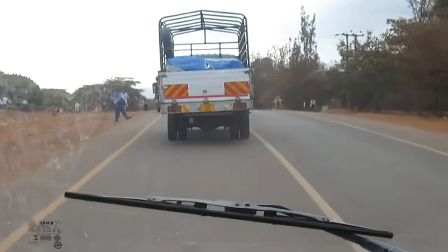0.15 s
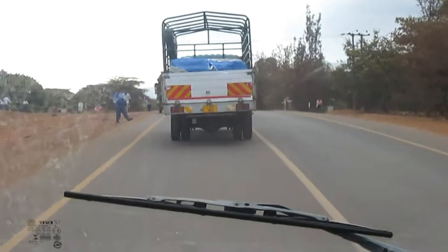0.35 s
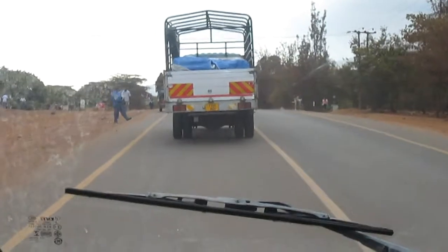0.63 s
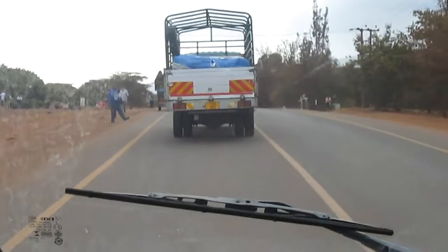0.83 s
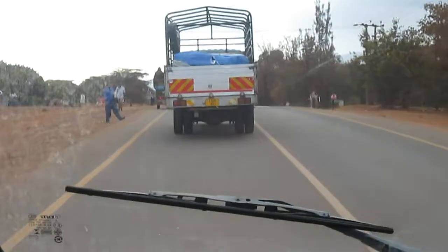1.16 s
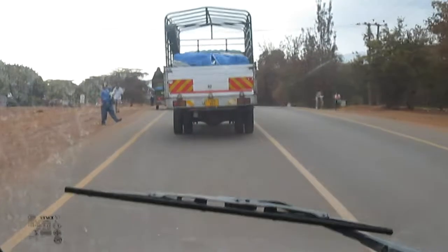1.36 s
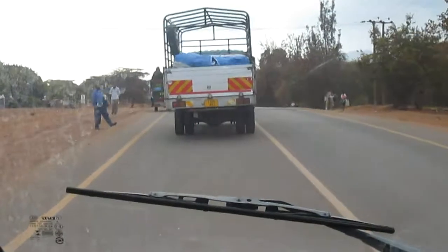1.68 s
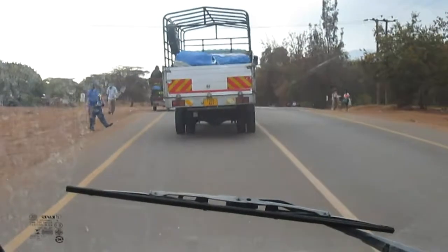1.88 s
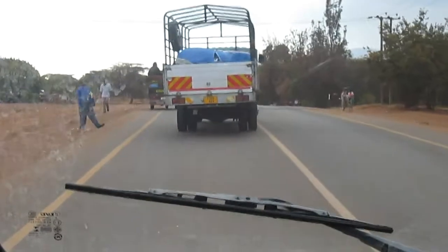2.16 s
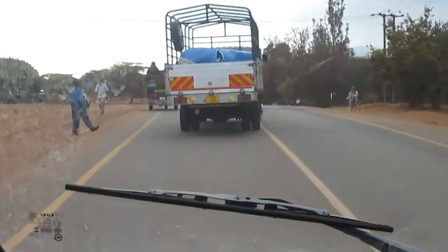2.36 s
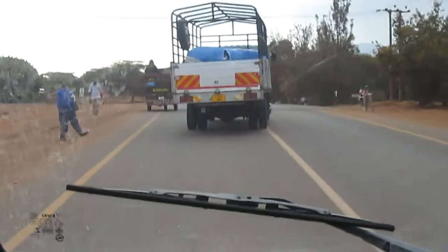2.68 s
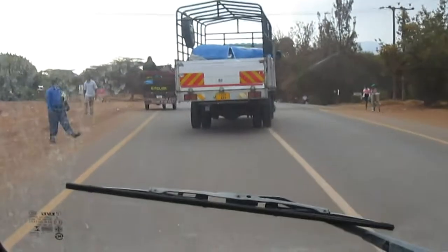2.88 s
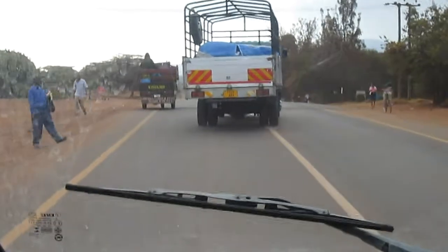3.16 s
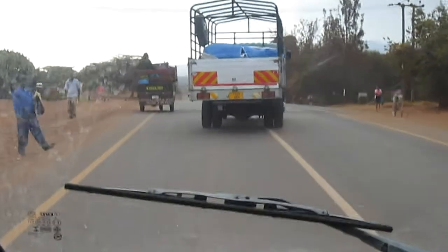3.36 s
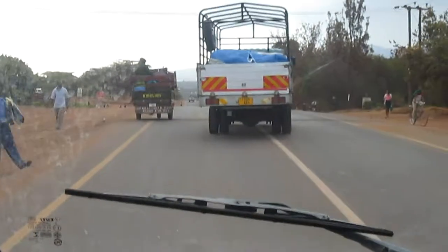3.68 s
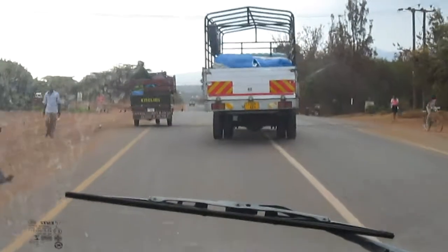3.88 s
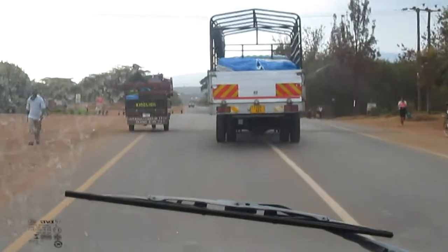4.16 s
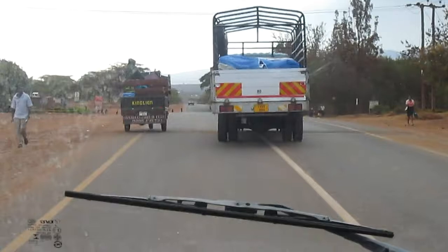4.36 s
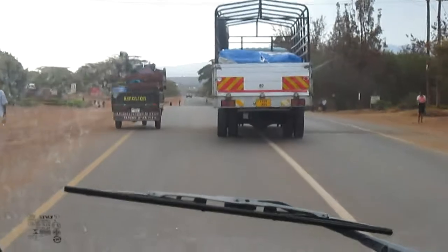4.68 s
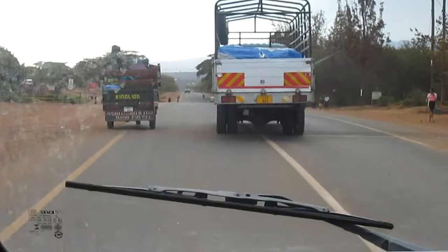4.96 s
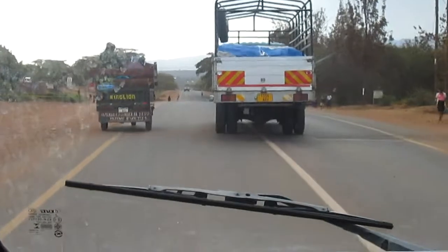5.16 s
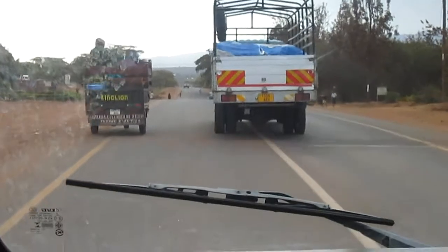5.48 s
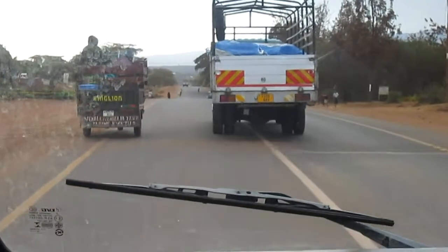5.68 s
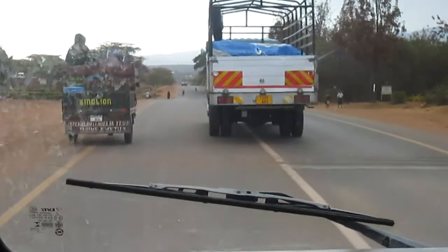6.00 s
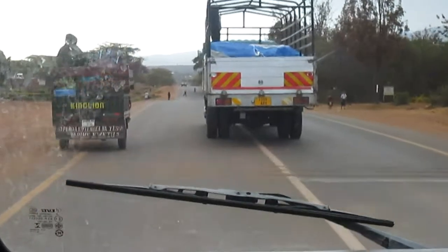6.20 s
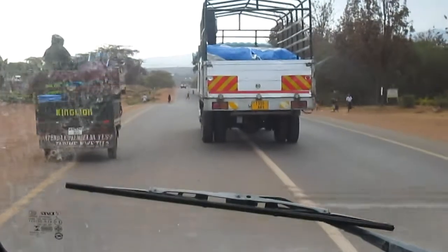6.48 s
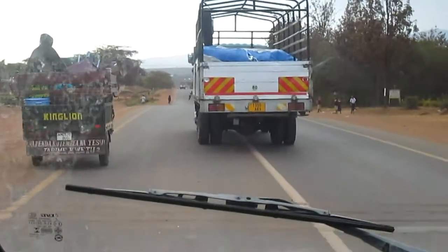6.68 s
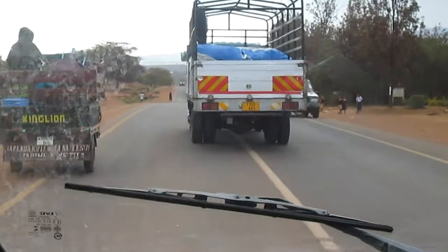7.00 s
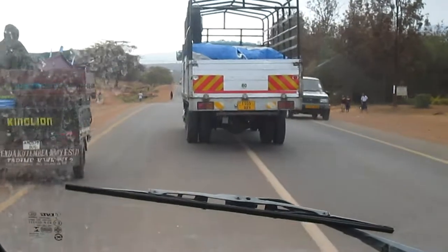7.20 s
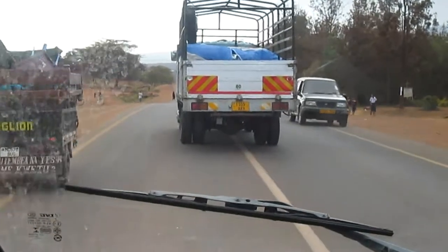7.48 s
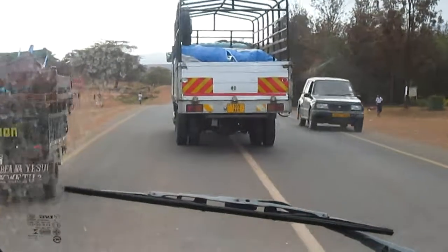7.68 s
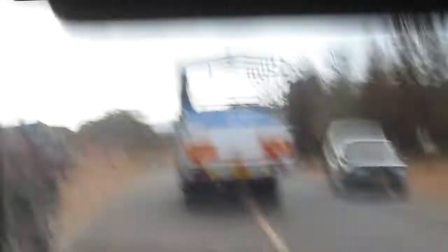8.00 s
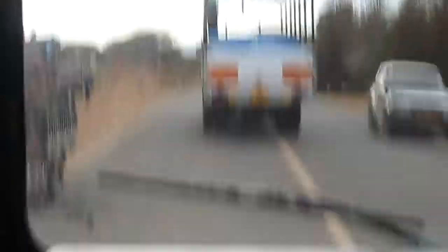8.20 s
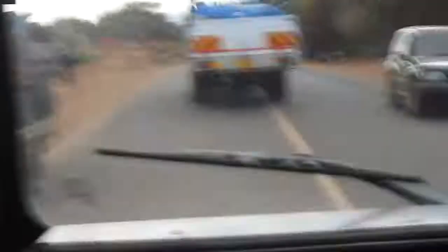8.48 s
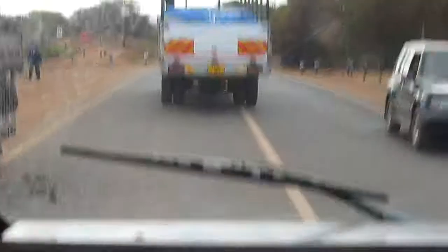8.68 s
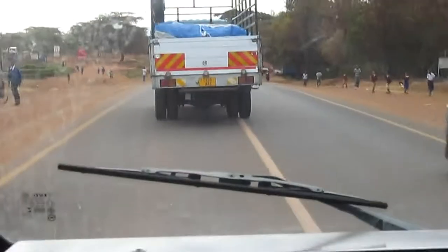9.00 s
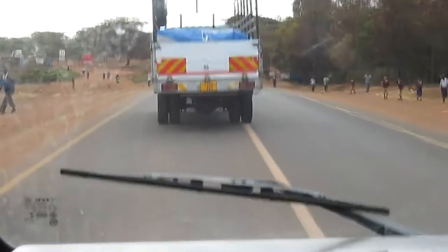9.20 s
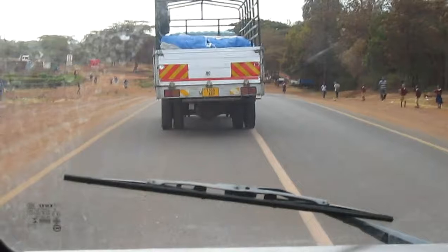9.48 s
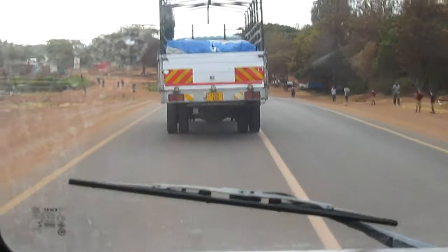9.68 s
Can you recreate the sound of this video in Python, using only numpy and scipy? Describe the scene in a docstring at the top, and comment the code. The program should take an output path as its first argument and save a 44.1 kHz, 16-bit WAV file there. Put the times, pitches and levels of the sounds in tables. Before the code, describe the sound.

Inside a vehicle on a tarred road, the engine booms and clatters over steady tyre rumble. A faint camera zoom motor whirs. About halfway the engine eases off, and the body knocks and loose fittings clonk over bumps, briefly lowering the overall level. Another bump and a second faint whir follow, then wind buffets and chokes the small microphone before the softer drone returns.

```python
"""Inside a four-cylinder vehicle on a tarred road, heard through a passenger's small camera.
The engine booms in the cabin's air modes and clatters under load, then coasts. Tyres rumble and hiss;
over two ridges the body knocks and loose fittings clonk. Each jolt ducks the camera's gain, which
recovers slowly. The zoom motor whirs twice; late gusts buffet, thump and choke the microphone."""
import sys
import numpy as np
from scipy import signal
from scipy.fft import rfft, irfft, next_fast_len
from scipy.io import wavfile

SR = 44100
rng = np.random.default_rng(int(sys.argv[2]) if len(sys.argv) > 2 else 0)


def to_wav(sig):
    """Store sig (one row per channel, or 1-D mono) as 16-bit WAV at the path in sys.argv[1].

    Samples outside -1..1 are clipped; the rate is SR.
    """
    pcm = np.clip(np.atleast_2d(sig), -1, 1) * 32767
    pcm = np.round(pcm).astype(np.int16)
    wavfile.write(sys.argv[1], SR, pcm.T)  # frames by channels


N = 434385
TIME = np.arange(N) / SR

# Gusts choke the microphone. Each row: start and end in seconds.
CHOKES = [(7.977, 7.982), (8.202, 8.211), (8.230, 8.240), (8.285, 8.296), (8.308, 8.330), (8.357, 8.375),
          (8.388, 8.398), (8.404, 8.415), (8.433, 8.448), (8.487, 8.497), (8.516, 8.530), (8.557, 8.563),
          (8.590, 8.603)]


def from_db(db):
    """Decibels to gain."""
    return 10 ** (np.asarray(db) / 20)


def rms_one(x):
    """Scale to rms 1."""
    return x / np.sqrt(np.mean(x ** 2) + 1e-20)


def curve(rows):
    """Straight lines through (seconds, value) rows."""
    return np.interp(TIME, *np.transpose(rows))


def window(start_s, end_s, edge_s):
    """Gate with sloping edges."""
    return np.clip(np.minimum(TIME - start_s, end_s - TIME) / edge_s + .5, 0, 1)


def swell(start_s, end_s, rise_db_per_s, fall_db_per_s):
    """Gain that reaches 1 at the start, holds, and falls after the end."""
    early_s, late_s = np.maximum(start_s - TIME, 0), np.maximum(TIME - end_s, 0)
    return from_db(-rise_db_per_s * early_s - fall_db_per_s * late_s)


def pulse(at_s, half_s):
    """Gaussian of height 1."""
    return np.exp(-((TIME - at_s) / half_s) ** 2)


def drift(rate_hz):
    """Random wander of spread 1."""
    step, settle = 40, 2000
    r = np.exp(-2 * np.pi * rate_hz * step / SR)
    slow = signal.lfilter([1], [1, -2 * r, r * r], rng.standard_normal(N // step + settle + 2))[settle:]
    return np.interp(np.arange(N) / step, np.arange(len(slow)), rms_one(slow))


def tone(turns, waver):
    """Sine of rms near 1, wavering in level and phase."""
    phase = 2 * np.pi * turns
    return np.sqrt(2) * ((1 + waver * drift(2.28)) * np.sin(phase) + waver * drift(4) * np.cos(phase))


def colour(x, spectrum):
    """Shape x by (Hz, dB) rows, rolling off beyond their ends; rms 1."""
    hz, db = np.transpose(spectrum)
    size = next_fast_len(N)
    log_f = np.log(np.maximum(np.arange(size // 2 + 1) * SR / size, 1))
    beyond = np.abs(log_f - np.clip(log_f, np.log(hz[0]), np.log(hz[-1])))
    shape = from_db(np.interp(log_f, np.log(hz), db) - 20 * beyond)
    return rms_one(irfft(rfft(x, size) * shape, size)[:N])


def noise(spectrum):
    """Coloured noise; rms 1."""
    return colour(rng.standard_normal(N), spectrum)


def resonance(x, hz, width_hz):
    """Two-pole band-pass, peak gain 1."""
    r = np.exp(-np.pi * width_hz / SR)
    poles = [1, -2 * r * np.cos(2 * np.pi * hz / SR), r * r]
    return signal.lfilter(np.array([1, 0, -1]) * (1 - r * r) / 2, poles, x)


def hiss_band(hz, width_hz):
    """Noise twice through one resonance; rms 1."""
    return rms_one(resonance(resonance(rng.standard_normal(N), hz, width_hz), hz, width_hz))


def ring(force, hz, t60_s):
    """Damped mode: a unit click rings a sine of height 1."""
    r, w = np.exp(-np.log(1000) / (t60_s * SR)), 2 * np.pi * hz / SR
    return signal.lfilter([0, np.sin(w)], [1, -2 * r * np.cos(w), r * r], force + 1e-18)


def mode_power(hz, centre_hz, width_hz):
    """Power response of one mode, peak 1."""
    return 1 / (1 + (2 * (hz - centre_hz) / width_hz) ** 2)


def draught():
    """Air hisses softly past the window seal."""
    # Each row: start and end in seconds, level in dB.
    draughts = [(5.405, 5.495, -34), (9.702, 9.85, -39.5)]
    # Each row: frequency in Hz, relative density in dB.
    seal_spectrum = [(700, 1.5), (2200, 4.5), (3600, -2.5), (5500, -6), (10000, -22), (15000, -30)]
    flow = sum(from_db(db) * swell(start_s, end_s, rise_db_per_s=62, fall_db_per_s=102)
               for start_s, end_s, db in draughts)
    return flow * noise(seal_spectrum)


def zoom_motor(fade_db_per_s=1.5, start_whine_s=.32, whir_db=-54.5):
    """Small gears whir and whine unevenly, brightest as the lens starts to move."""
    # Each row: start and end in seconds.
    runs = [(1.94, 2.475), (7.075, 7.8)]
    # Running and starting whine. Each row: centre in Hz, level in dB, width in Hz.
    gear_bands = [(5880, -57.5, 130), (6600, -56.5, 60), (6760, -60.5, 190), (7400, -63, 200),
                  (7530, -63.5, 130)]
    start_bands = [(8629, -80, 120), (11267, -71.5, 170), (12064, -80, 170), (12570, -73, 170),
                   (13810, -77, 170), (14890, -81, 170)]
    running = sum(from_db(-fade_db_per_s * (TIME - start_s)) * window(start_s, end_s, edge_s=.03)
                  for start_s, end_s in runs)
    starting = sum(window(start_s, start_s + start_whine_s, edge_s=.1) for start_s, _ in runs)
    gears = sum(from_db(db) * hiss_band(hz, width_hz) for hz, db, width_hz in gear_bands)
    thin_whine = sum(from_db(db) * hiss_band(hz, width_hz) for hz, db, width_hz in start_bands)
    waver = from_db(drift(25))
    whir = from_db(whir_db) * noise([(3500, 6), (7000, -1.5), (8500, -10), (12000, -11), (15500, -16)])
    return waver * (running * (gears + whir) + starting * thin_whine)


def tyres(wheel_turns, effort_db):
    """The road shakes the body; the wheels throb twice a turn and swish once a turn."""
    # Each row: frequency in Hz, relative density in dB.
    rumble_spectrum = [(10, -19), (22, 0.5), (36, -0.5), (50, -4.5), (78, -2.5), (98, -7), (135, -1.5),
                       (175, -5.5), (235, -11.5), (300, -12.5), (410, -16.5), (500, -25.5), (800, -34.5),
                       (1500, -46)]
    hiss_spectrum = [(2000, 7.5), (3500, -1), (4600, -5), (5400, -6.5), (6400, -7.5), (7400, -13),
                     (9800, -11.5), (12000, -20), (15500, -34)]
    # Road roughness. Each row: time in seconds, added rumble in dB.
    roughness = [(0, 0), (1.6, .5), (3.0, -2), (3.9, -1.5), (4.7, 1), (5.4, 2), (6.3, 0), (9.85, -.5)]
    rumble_db = -19.5 + effort_db + curve(roughness)
    rumble = from_db(rumble_db - .25 * drift(11)) * noise(rumble_spectrum)
    throb = from_db(rumble_db - 8) * tone(2 * wheel_turns, waver=.69)
    flutter_db = .22 * np.cos(2 * np.pi * wheel_turns) + 2.04 * drift(22)
    hiss = from_db(-2.5 + flutter_db) * noise(hiss_spectrum)
    for hz, width_hz, lead_turns in [(4930, 720, -.083), (5480, 970, .11)]:
        swish_db = -11.5 + 4 * np.cos(2 * np.pi * (wheel_turns + lead_turns))
        hiss += from_db(swish_db) * hiss_band(hz, width_hz)
    return rumble + throb + from_db(-45.5 + effort_db) * hiss


def knocks(rebound_s=.0063, rebound_loss_db=4):
    """Rubber-cushioned suspension blows ring the body; harder contacts are shorter and brighter."""
    # Each row: start in seconds, impulse in dB, contact brightness in Hz, rebound count.
    blows = [(4.867, 2, 151, 1), (4.879, 1, 150, 1), (4.97, -5.5, 260, 1), (5.029, 5.5, 190, 0),
             (5.0851, 13, 150, 0), (5.131, 7, 190, 1), (5.488, 15.5, 108, 0), (5.501, 14.5, 105.5, 0),
             (5.533, -3.5, 650, 0), (5.562, 9, 353, 0), (5.572, 8, 506, 2), (7.246, 8.5, 176, 0),
             (7.258, 5, 252, 2), (7.269, 5, 230, 0), (7.457, 8, 166, 0), (7.482, 13.5, 150, 0)]
    # Each row: frequency in Hz, relative gain in dB, t60 in seconds.
    body_modes = [(93.5, -4, 0.044), (204, 0.5, 0.024), (286, -2.5, 0.028), (398, -5.5, 0.054),
                  (610, -5, 0.02), (792, -6.5, 0.03), (900, -0.5, 0.012), (1285, -10, 0.017),
                  (1730, -15, 0.013)]
    force, age = np.zeros(N), np.arange(SR // 50)
    for start_s, db, contact_hz, rebounds in blows:
        push = age ** 3 * np.exp(-4 * np.pi * contact_hz * age / SR)
        for k in range(rebounds + 1):
            at = round((start_s + k * rebound_s) * SR)
            force[at:at + len(age)] += from_db(db - k * rebound_loss_db) * push / push.sum()
    return sum((-1) ** k * from_db(db + 2.5) * ring(force, hz, t60_s)
               for k, (hz, db, t60_s) in enumerate(body_modes))


def clonks():
    """Loose fittings jump and land, each with a few damped cycles of a hollow note."""
    # Each row: start in seconds, envelope peak in dB, pitch in Hz, ring time in seconds.
    landings = [(4.971, -4.5, 340, 0.0019), (4.973, -10, 598, 0.0038), (4.974, -18, 1370, 0.0012),
                (4.980, -3.5, 790, 0.0026), (5.0851, 4, 730, 0.0009), (5.086, -16, 1750, .0007),
                (5.567, -2, 880, 0.0011), (5.5725, 6.5, 630, 0.00086), (5.575, -13, 1190, .0025),
                (5.577, -14, 1740, 0.001), (5.585, -7, 740, 0.0021), (7.243, 4, 224, 0.0035),
                (7.256, -2, 445, 0.0043), (7.257, -26, 1210, 0.0024), (7.458, -6, 220, .0026),
                (7.487, -11, 380, 0.0011)]
    out, age_s = np.zeros(N), np.arange(SR // 10) / SR
    for start_s, db, hz, ring_s in landings:
        at = round(start_s * SR)
        envelope = age_s / ring_s * np.exp(1 - age_s / ring_s)
        out[at:at + len(age_s)] += from_db(db) * envelope * np.sin(2 * np.pi * hz * age_s)
    return out


def jolts():
    """The suspension bottoms out, sending a loud one-sided pressure pulse through the cabin."""
    # Each row: time in seconds, peak in dB.
    peaks = [(4.9833, 16), (7.263, 12)]
    return sum(from_db(db) * pulse(at_s, half_s=.00096) for at_s, db in peaks)


def crackle(snaps_per_s=260, spread_db=2.5):
    """Random snaps of uneven size in the rushing air; rms 1."""
    # Each row: frequency in Hz, relative density in dB.
    snap_spectrum = [(300, 1.5), (1000, -1.5), (2500, -10), (5000, -19), (10000, -28), (15500, -42)]
    sizes = from_db(spread_db * np.minimum(rng.exponential(1, N), 3)) * rng.choice([-1, 1], N)
    return colour(sizes * (rng.random(N) < snaps_per_s / SR), snap_spectrum)


def rasps(relative_width=.65):
    """Short, hollow, rough bursts within the gusts."""
    # Each row: time and half length in seconds, centre in Hz, level in dB.
    bursts = [(7.921, 0.0078, 370, -8), (7.925, 0.011, 1700, -18), (7.994, .006, 890, -12),
              (8.243, .004, 1100, -17), (8.272, .01, 330, -16), (8.3, .005, 1900, -17),
              (8.338, .009, 350, -14.5), (8.38, .005, 1300, -17), (8.401, .003, 1500, -17),
              (8.473, .013, 370, -12), (8.537, 0.0045, 700, -18), (8.623, 0.015, 300, -20)]
    return sum(from_db(db) * pulse(at_s, half_s) * hiss_band(hz, relative_width * hz)
               for at_s, half_s, hz, db in bursts)


def gusts(release_db=3, release_s=.0065, overload_db=10):
    """Turbulence saturates the microphone port: heaves and thumps under a ragged, crackling rush."""
    # Each row: start and end in seconds, rush in dB, buffeting in dB.
    blasts = [(7.83, 7.86, -12, -11.5), (7.89, 7.969, -5, -5), (7.995, 8.054, -6.5, -8.5),
              (8.09, 8.142, -10.5, -14), (8.207, 8.282, -13, -7), (8.298, 8.49, -7, -8.5),
              (8.51, 8.558, -14, -10), (8.606, 8.66, -23, -13)]
    # Each row: frequency in Hz, relative density in dB.
    buffet_spectrum = [(8, -37), (15, -4.5), (26, -8.5), (45, -18.5), (90, -32)]
    rush_spectrum = [(40, -1.5), (90, -4), (150, -5.5), (330, -13.5), (600, -26.5), (1200, -28.5),
                     (2500, -39.5), (5000, -46), (10000, -54.5), (15500, -66)]
    # The hardest eddies. Each row: time in seconds, peak in dB.
    thumps = [(7.969, 6.5), (8.046, 6), (8.221, 7), (8.383, 6), (8.479, -2)]
    rush = sum(from_db(db) * swell(start_s, end_s, rise_db_per_s=600, fall_db_per_s=500)
               for start_s, end_s, db, _ in blasts)
    heave = sum(from_db(db) * swell(start_s, end_s, rise_db_per_s=600, fall_db_per_s=109)
                for start_s, end_s, _, db in blasts)
    # The rush bursts back after each choke, then settles.
    release = sum((TIME > end_s) * np.exp(-np.abs(TIME - end_s) / release_s) for _, end_s in CHOKES)
    air = heave * noise(buffet_spectrum)
    ragged_db = 1.66 * drift(49) + 2 * drift(320)
    air += from_db(release_db * release + ragged_db) * rush * noise(rush_spectrum)
    air += from_db(-14) * rush * crackle() + rasps()
    air -= sum(from_db(db) * pulse(at_s, half_s=.002) for at_s, db in thumps)
    ceiling = from_db(overload_db)
    return ceiling * np.tanh(air / ceiling)


def shaft_hum(shaft_turns):
    """The drive shaft hums at its turning rate, strongest while coasting."""
    # Each row: time in seconds, level in dB.
    levels = [(0, -17.5), (.7, -26), (1.4, -30.5), (3.1, -44), (4.8, -28.5), (5.6, -16.5), (7.1, -15.5),
              (7.9, -16.5), (8.8, -23), (9.85, -29)]
    return from_db(curve(levels)) * tone(shaft_turns, waver=.25)


def loose_valve(cycles, strength_db):
    """One valve chatters once a cycle: a bright tick, then lower, longer rings."""
    # Each row: place and half length in cycles, centre and width in Hz, level in dB at 0 dB strength.
    ticks = [(0.79, .05, 1620, 750, -34.5), (.87, 0.065, 1450, 550, -37.5), (.05, 0.06, 1000, 500, -36)]
    out = np.zeros(N)
    for place, half_length, hz, width_hz, db in ticks:
        offset = (cycles - place + .5) % 1 - .5
        envelope = np.exp(-(offset / half_length) ** 2)
        out += from_db(db + .48 * strength_db) * envelope * hiss_band(hz, width_hz)
    return out


def clatter(cycles, repeat_share=.52):
    """Injectors and valves rattle, partly alike every cycle, and ring the block and dashboard."""
    # Each row: frequency in Hz, relative density in dB.
    rattle_spectrum = [(250, -6.5), (520, 0), (640, -2.5), (850, 0.5), (1050, -1), (1500, -3.5),
                       (2000, -14.5), (2800, -15.5), (3600, -25), (5000, -27.5), (9000, -50.5)]
    # Each row: centre and width in Hz, relative gain in dB.
    block_modes = [(951, 20, 2), (904, 92, -8), (1127, 70, -9), (1548, 34, 2), (1700, 34, -12.5),
                   (1815, 43, 9.5), (2184, 160, 3), (2450, 82, -5.5), (2800, 91, -11.5)]
    pattern = np.interp(cycles % 1, np.arange(2048) / 2048, rng.standard_normal(2048), period=1)
    drive = np.sqrt(repeat_share) * pattern + np.sqrt(1 - repeat_share) * rng.standard_normal(N)
    rattle = colour(drive, rattle_spectrum)
    rings = sum((-1) ** k * from_db(db) * resonance(rattle, hz, width_hz)
                for k, (hz, width_hz, db) in enumerate(block_modes))
    rings = np.roll(rms_one(rings), SR // 340)  # short delay so rings and direct rattle do not cancel
    return from_db(-12) * rings + from_db(-3) * rattle


def panel_drone(firings, firing_hz, level_db):
    """Weaker engine orders swell as they sweep through panel resonances."""
    # Each row: multiple of the firing rate, relative level in dB.
    orders = [(1.5, -3), (2.25, -4.5), (3, -4.5), (3.5, -10), (4, -14), (4.5, -17), (5, -12), (5.5, -18.5),
              (6, -16.5), (6.5, -17.5), (7, -21.5), (8.5, -25), (9, -27), (14.25, -28), (15, -25),
              (15.25, -28), (15.5, -30), (17.25, -26.5), (18, -27), (19, -27.5), (21, -28), (22, -26),
              (23, -27.5)]
    # Each row: centre and width in Hz, resonant gain in dB.
    panels = [(200, 8, 4), (239, 6, 10), (305, 7, 8), (532, 12, 9), (560, 14, 10), (952, 18, 13.5),
              (984, 26, 9.5), (1145, 40, 6), (1190, 20, 7.5), (1398, 30, 6), (1462, 36, 7.5)]
    out = np.zeros(N)
    for order, order_db in orders:
        power = sum(from_db(db) ** 2 * mode_power(order * firing_hz[::200], hz, width_hz)
                    for hz, width_hz, db in panels)
        boost = np.interp(TIME, TIME[::200], np.sqrt(1 + power))
        out += from_db(level_db + order_db) * boost * tone(order * firings, waver=.35)
    return out


def cabin_boom(firings, firing_hz, strength_db):
    """Firing tone and octave boom in two cabin air modes; a weak half order follows the firing tone."""
    low_mode = mode_power(firing_hz, centre_hz=60.46, width_hz=9)
    high_mode = mode_power(2 * firing_hz, centre_hz=130.3, width_hz=8)
    firing_db = -14.5 + 20 * np.log10(low_mode) + .29 * strength_db
    octave_db = -14 + 10 * np.log10(high_mode) + strength_db
    out = from_db(firing_db) * tone(firings + 1 / 4, waver=.08)
    out += from_db(octave_db) * tone(2 * firings + 1 / 4, waver=.19)
    return out + from_db(firing_db - 16) * tone(firings / 2, waver=.2)


def scene():
    """Engine, wheels and shaft turn together in one gear; mono."""
    # Each row: time in seconds, firing rate in Hz.
    engine_speed = [(0, 58.6), (.6, 61.1), (1.3, 62.8), (2, 64.2), (2.8, 65.8), (3.5, 66.7), (4.5, 67),
                    (5, 67.4), (5.6, 66.1), (6.4, 64.7), (7.2, 63.6), (8, 62.9), (8.7, 61.6), (9.85, 61.4)]
    # Strength of the boom, drone and valve chatter: uneven at first, then fading as the engine coasts.
    # Each row: time in seconds, strength in dB.
    engine_strength = [(0, -.5), (.7, -1.5), (2.3, 1.5), (3.0, -4.5), (3.4, 0.5), (3.8, -4.5), (4.3, -.5),
                       (5.1, -12), (7.2, -7.5), (9.85, -14.5)]
    # Driving effort lifts rumble, hiss, drone and clatter. Each row: time in seconds, gain in dB.
    effort = [(0, 1.5), (.7, -2), (1.3, 0), (1.9, -1.5), (2.7, -0.36), (3.3, 2.5), (3.9, 4.5), (4.7, 1),
              (5.3, 3.5), (6.6, 3), (7.4, 3), (8.8, -1), (9.85, -1.5)]
    firing_hz, strength_db, effort_db = curve(engine_speed), curve(engine_strength), curve(effort)
    firings = np.cumsum(firing_hz) / SR
    cycles, shaft_turns, wheel_turns = firings / 4, 2.163 * firings, .1619 * firings + .2
    clatter_db = -31 + effort_db
    engine = cabin_boom(firings, firing_hz, strength_db) + shaft_hum(shaft_turns)
    engine += panel_drone(firings, firing_hz, clatter_db + .36 * strength_db)
    engine += from_db(clatter_db) * clatter(cycles) + loose_valve(cycles, strength_db)
    road = tyres(wheel_turns, effort_db) + knocks() + clonks() + jolts()
    return (engine + road + draught() + zoom_motor() + gusts())[None]


def gain_control(x, limit_db=-.5, attack_s=.00051, recovery_db_per_s=4):
    """A peak over the limit ducks everything; the gain then creeps back."""
    over_db = np.maximum(20 * np.log10(np.abs(x) + 1e-9) - limit_db, 0)
    recovery_db = recovery_db_per_s * TIME
    cut_db = np.maximum.accumulate(over_db + recovery_db, axis=-1) - recovery_db
    r = np.exp(-1 / (attack_s * SR))
    return x * from_db(-signal.lfilter([1 - r], [1, -r], cut_db))


def record(dry):
    """Camera: gain control, two microphone notches, choke dropouts, soft clip, low-pass."""
    ceiling, cutoff_hz = .97, 15750
    x = gain_control(dry) * np.minimum(TIME / .01, 1)
    for hz, width_hz in [(3935, 170), (7850, 140)]:
        x = signal.lfilter(*signal.iirnotch(hz, hz / width_hz, fs=SR), x)
    choked = np.clip(sum(window(start_s, end_s, edge_s=.002) for start_s, end_s in CHOKES), 0, 1)
    x = x * (1 - .99 * np.sin(np.pi / 2 * choked) ** 2)
    x = x / (1 + (x / ceiling) ** 8) ** (1 / 8)
    return signal.sosfilt(signal.ellip(12, .1, 80, cutoff_hz, fs=SR, output="sos"), x)


dry = scene()
out = record(dry)
to_wav(out)
```